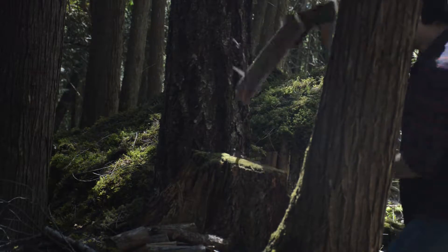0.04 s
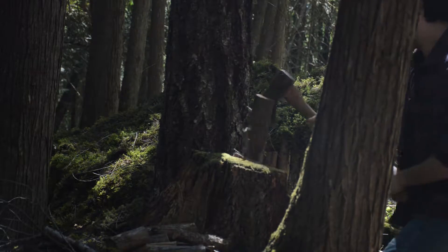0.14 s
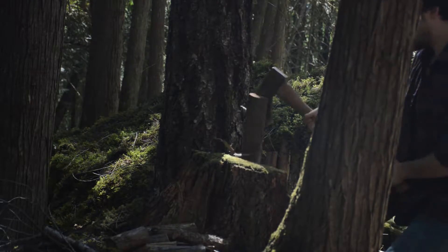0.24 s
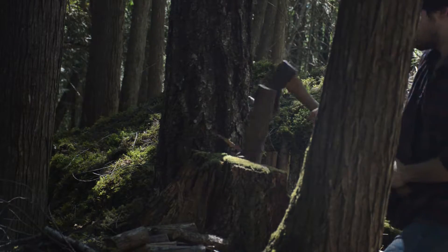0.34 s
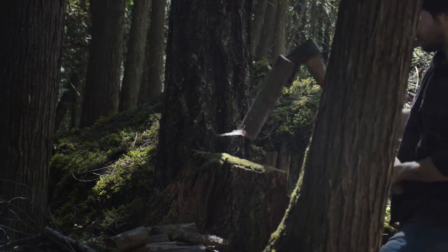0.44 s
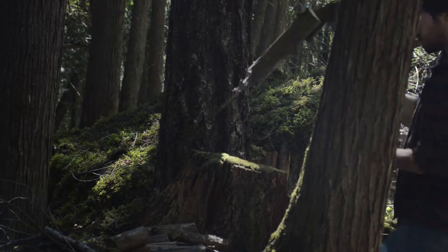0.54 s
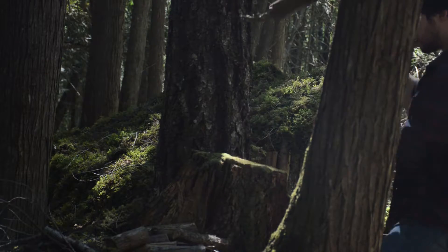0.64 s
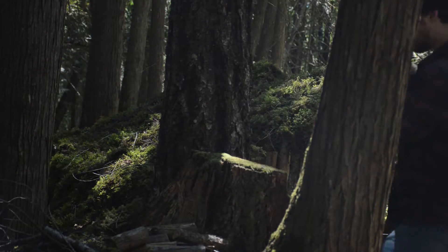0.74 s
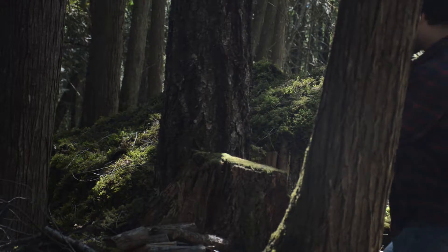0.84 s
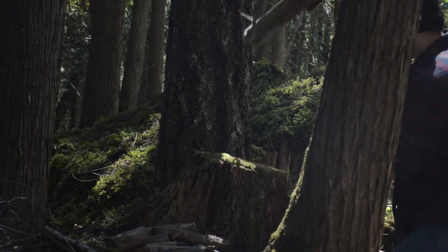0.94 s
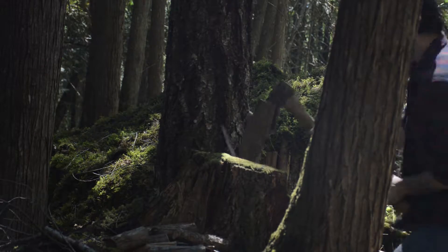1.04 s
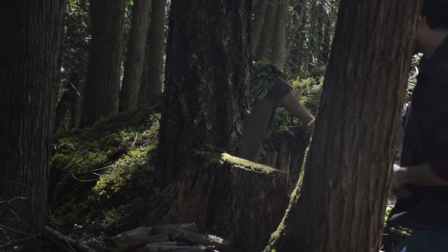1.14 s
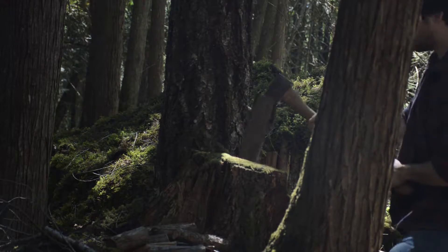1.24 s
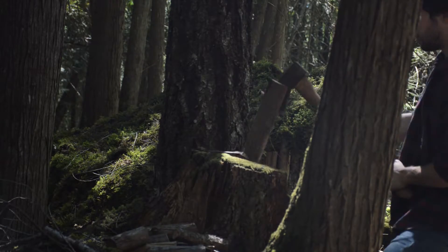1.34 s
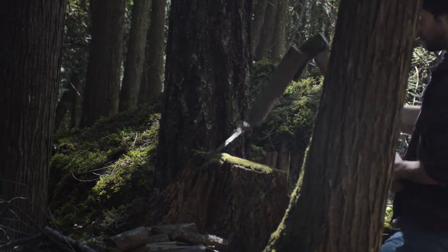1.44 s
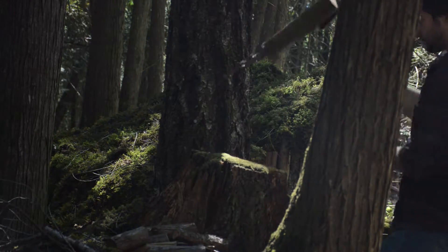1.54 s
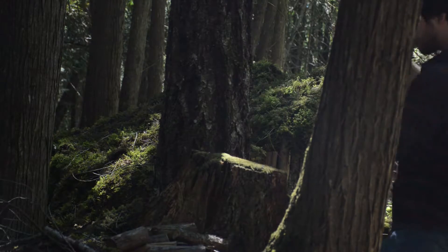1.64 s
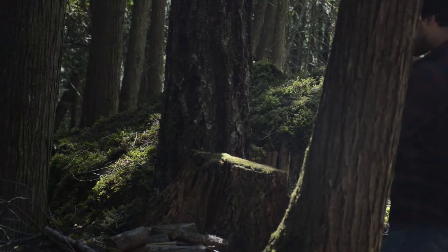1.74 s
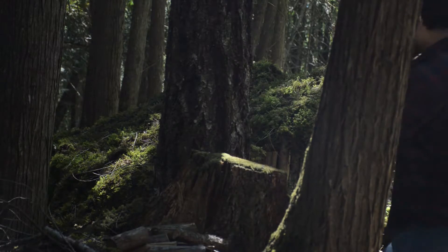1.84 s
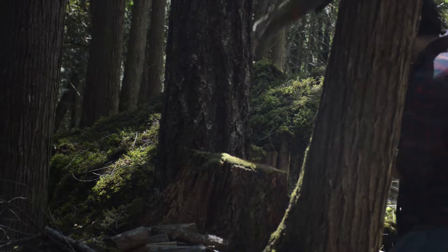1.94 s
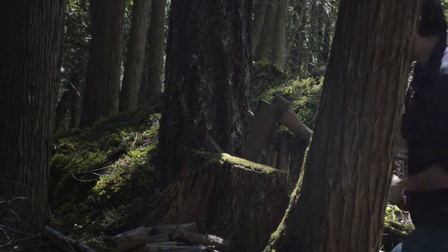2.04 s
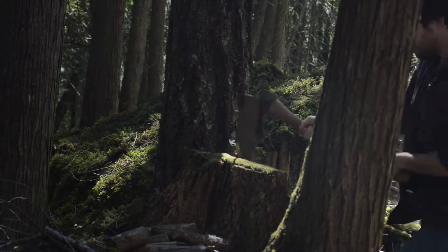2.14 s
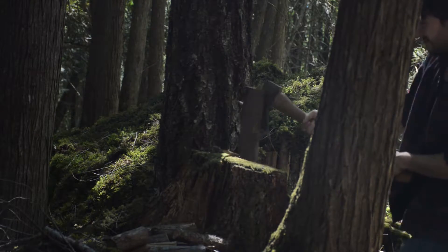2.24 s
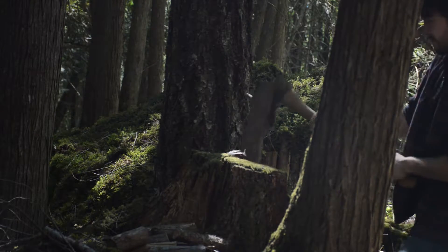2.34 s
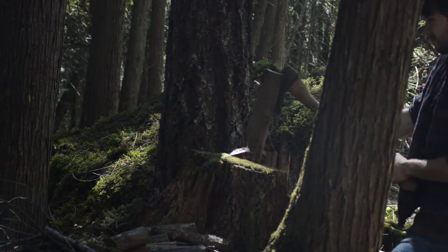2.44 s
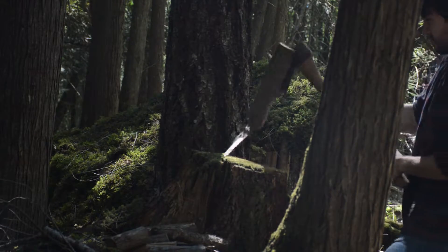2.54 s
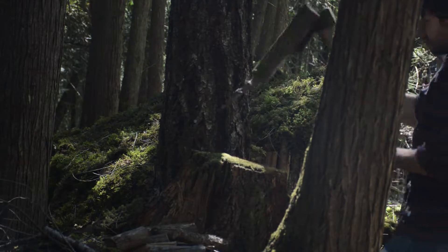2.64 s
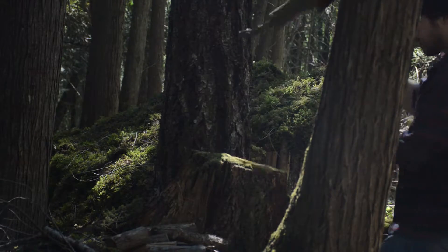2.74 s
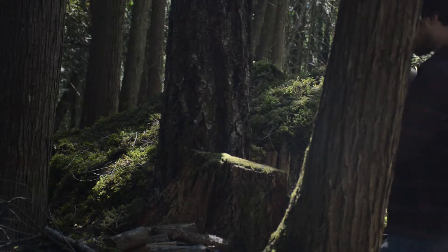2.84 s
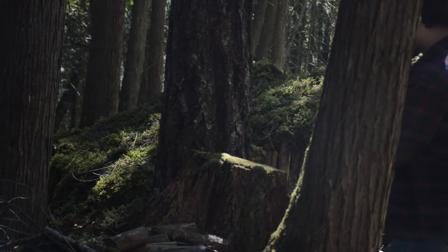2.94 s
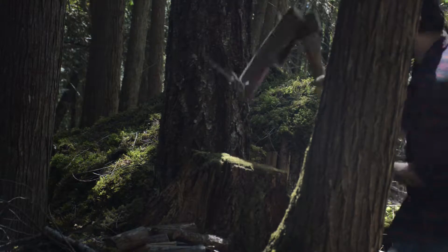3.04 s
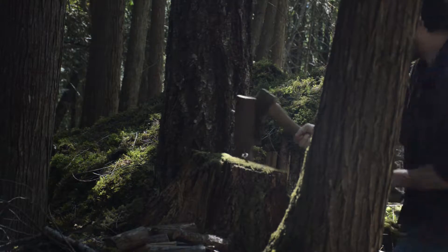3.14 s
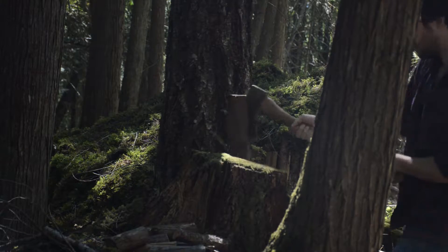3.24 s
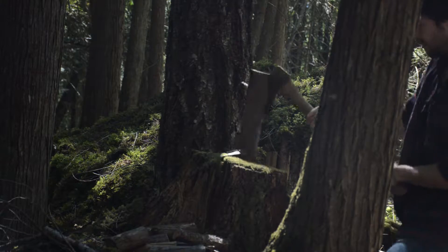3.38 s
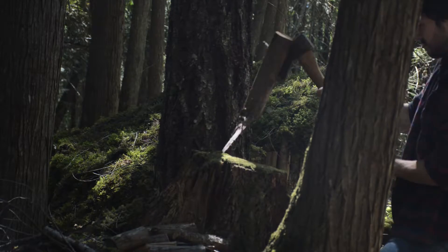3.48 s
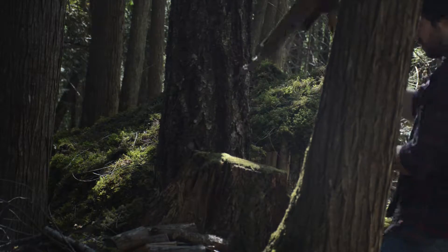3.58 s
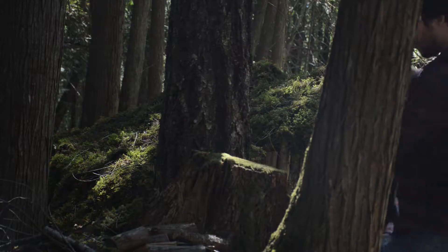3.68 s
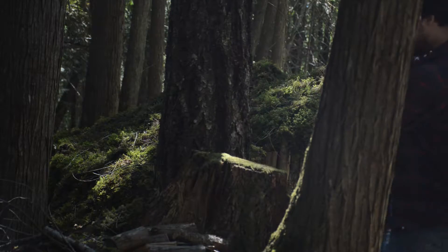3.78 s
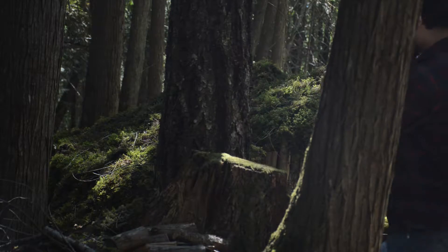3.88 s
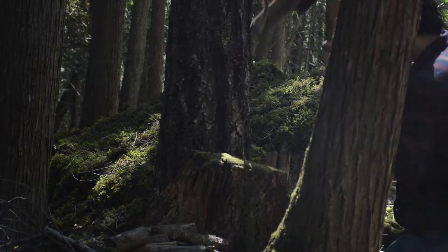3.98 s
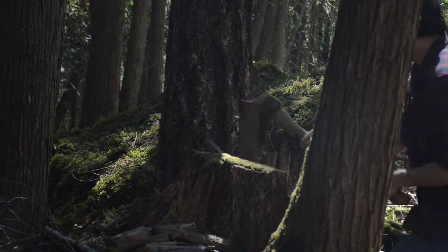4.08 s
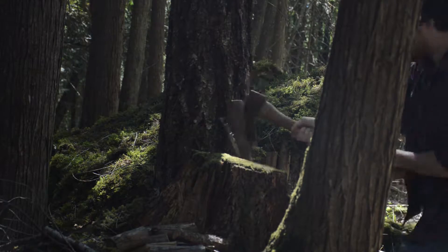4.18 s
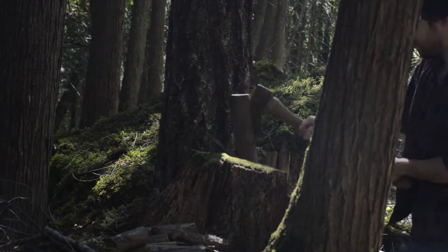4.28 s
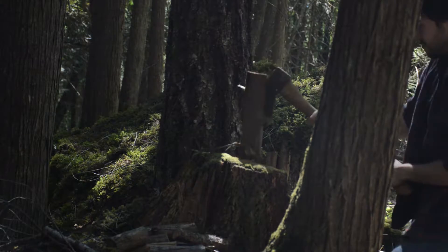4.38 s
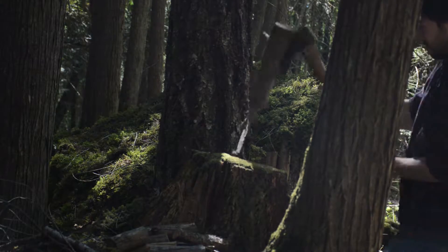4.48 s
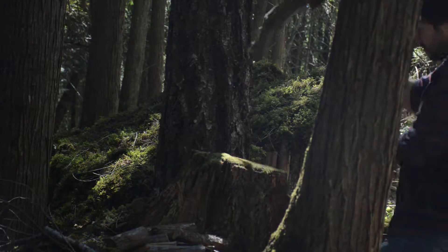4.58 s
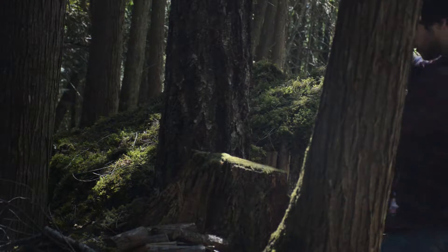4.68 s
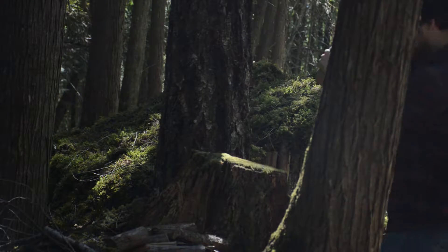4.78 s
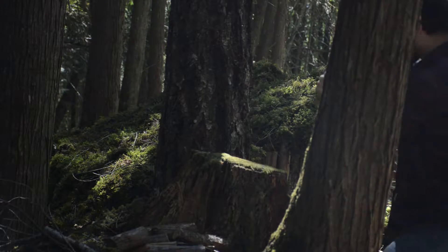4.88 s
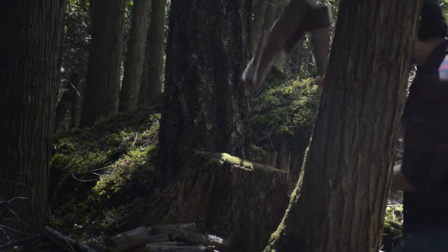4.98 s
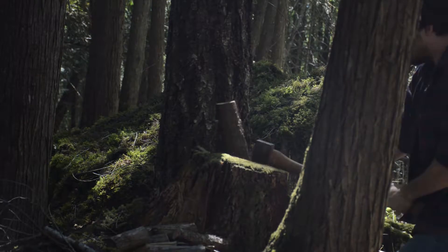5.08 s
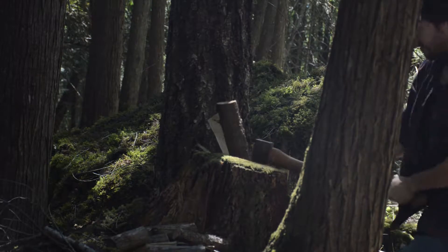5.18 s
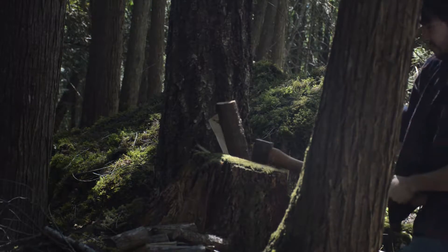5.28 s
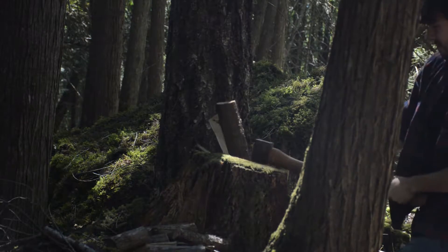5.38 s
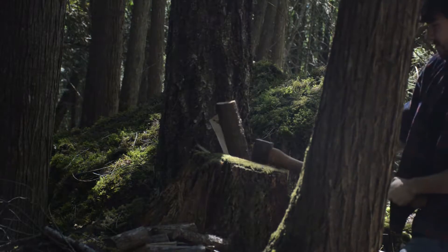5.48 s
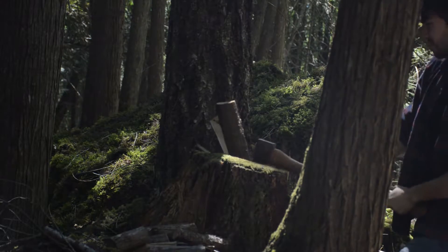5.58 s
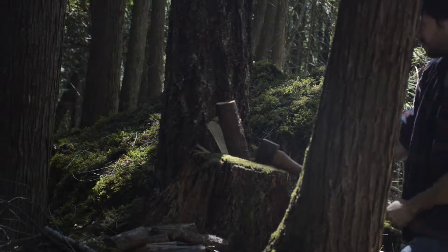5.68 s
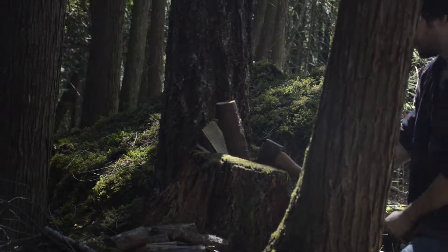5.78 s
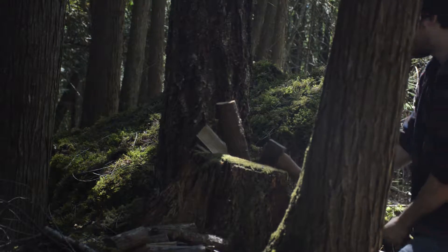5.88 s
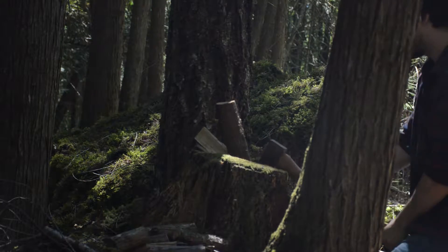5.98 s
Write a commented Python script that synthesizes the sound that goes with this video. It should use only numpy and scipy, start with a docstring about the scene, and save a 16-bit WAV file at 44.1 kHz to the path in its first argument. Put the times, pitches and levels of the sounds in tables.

```python
"""A small axe, wedged in a log, is swung down on a mossy stump six times in a conifer forest.
Each blow is a crunch of wood on wood, a crack as the blade drives deeper and a dull thud of the stump,
made of noise bursts and decaying resonances. Near trunks spray the sound back and the far forest adds a tail.
Air hisses softly, wood ticks, sleeves brush and a few birds whistle. The hardest cracks overload the microphone."""
import sys
import numpy as np
from scipy import signal
from scipy.fft import rfft, irfft, next_fast_len
from scipy.io import wavfile

SR = 44100
rng = np.random.default_rng(int(sys.argv[2]) if len(sys.argv) > 2 else 0)


def store_pcm(level_fs):
    """Save levels as 16-bit WAV."""
    pcm = np.round(np.clip(level_fs, -1, 1) * 32767).astype(np.int16)
    wavfile.write(sys.argv[1], SR, np.atleast_2d(pcm).T)


N = 265466
T = np.arange(N) / SR  # seconds
LEAD_S = 0.01  # silence ahead of each burst, room for its filters to spread


def from_db(db):
    """Turn decibels into an amplitude factor."""
    return 10 ** (np.asarray(db) / 20)


def rms_one(x):
    """Scale to an rms of 1."""
    return x / np.sqrt(np.mean(x ** 2) + 1e-20)


def at_hz(points, hz, axis=1):
    """Read one column of a table on a log-frequency axis."""
    points = np.array(points)
    log_hz = np.log(np.maximum(hz, 1))
    return np.interp(log_hz, np.log(points[:, 0]), points[:, axis])


def colour(x, spectrum, tilt_db=0):
    """Give a sound a spectrum, tilted per octave above 250 Hz; an even sound about keeps its energy."""
    padded = next_fast_len(len(x))
    hz = np.fft.rfftfreq(padded, 1 / SR)
    tilt = tilt_db * np.log2(np.maximum(hz, 250))
    gain = rms_one(from_db(at_hz(spectrum, hz) + tilt))
    return irfft(rfft(x, padded) * gain, padded)[:len(x)]


def noise(spectrum, size):
    """Steady noise of a given colour; rms 1."""
    return rms_one(colour(rng.standard_normal(size), spectrum))


def add(track, s, sound):
    """Mix a sound into a track from a given time on."""
    start = int(s * SR)
    track[start:start + len(sound)] += sound[:N - start]


def burst(t, length, rise, fall):
    """Fibres start to give, keep breaking for a while, then settle."""
    settling = np.exp(-np.maximum(t - length, 0) / fall)
    return (1 - np.exp(-t / rise)) * settling


def fracture(shape, count=2):
    """Force of countless breaking fibres: random under its envelope, and nearly even across frequency."""
    force = rng.standard_normal(len(shape)) * shape
    for _ in range(count):
        flattened = irfft(np.exp(1j * np.angle(rfft(force))), len(shape))
        force = flattened * np.sqrt(shape)
    return force * np.linalg.norm(shape) / np.linalg.norm(force)


def resonate(x, hz, width):
    """One damped two-pole resonance, with a gain of about 1 at its peak."""
    r = np.exp(-np.pi * width / SR)
    zeros = np.array([1, 0, -1]) * (1 - r * r) / 2
    poles = [1, -2 * r * np.cos(2 * np.pi * hz / SR), r * r]
    return signal.lfilter(zeros, poles, x)


def ringing(modes, shape):
    """Wood rings under a rough force; keeps the energy of the force's envelope."""
    force = fracture(shape)
    ring = 0
    for k, (hz, width, db) in enumerate(modes):
        ring = ring + (-1) ** k * from_db(db) * resonate(force, hz, width)
    return ring * np.linalg.norm(shape) / np.linalg.norm(ring)


# Spectrum of the forest air at the microphone. Each row: frequency in Hz, relative density in dB per Hz.
AIR_SPECTRUM = [(20, -8.5), (40, -3), (66, -4), (82, -6.5), (99, 3), (125, -8), (195, -9), (320, -13),
                (600, -8.5), (1600, -7.5), (3200, -11), (7000, -21), (9800, -24), (12500, -32.5),
                (16000, -35)]
AIR_DB = -44.5


def air():
    """The forest air is a steady, soft hiss of coloured noise."""
    return from_db(AIR_DB) * noise(AIR_SPECTRUM, N)


# The log shifts on the blade, chips drop. Each row: start in seconds, level in dB.
TICKS = [(0.15, -24.5), (0.2983, -41), (1.227, -39), (3.0356, -39), (3.2790, -40), (4.074, -21),
         (4.46, -41), (5.0223, -41.5)]
# Sleeves brush during the swing. Each row: middle in seconds, level in dB, half length in seconds.
BRUSHES = [(1.065, -40, 0.0045), (1.59, -53.5, .035), (2.037, -41, 0.0066), (4.42, -55, 0.022)]
# Spectrum shared by ticks and brushes. Each row: frequency in Hz, relative density in dB per Hz.
SMALL_WOOD = [(300, -47.5), (1500, -23), (2600, -8), (5000, -4.5), (7500, 1.5), (10500, 0), (13000, -16.5),
              (16000, -21)]
# a louder tick is a longer slip: its length at a reference level, and the dB that double it
TICK_S, TICK_DB, TICK_DB_PER_DOUBLING = 0.00092, -41, 16


def handling():
    """Dry ticks of wood and short brushes of cloth, both bright noise under brief envelopes."""
    out, t = np.zeros(N), T[:SR // 20]
    for s, db in TICKS:
        length = TICK_S * 2 ** ((db - TICK_DB) / TICK_DB_PER_DOUBLING)
        slip = burst(t, length, rise=0.00031, fall=0.00085)
        add(out, s, from_db(db) * noise(SMALL_WOOD, len(t)) * slip)
    strokes = sum(from_db(db) * np.exp(-((T - s) / half) ** 2 / 2) for s, db, half in BRUSHES)
    return out + strokes * noise(SMALL_WOOD, N)


def linger(power, onset, t60):
    """Sound energy builds up, then dies away; its total is kept."""
    rise = np.exp(-1 / (onset * SR))
    fall = from_db(-60 / (t60 * SR)) ** 2  # squared, as it acts on power
    return signal.lfilter([(1 - rise) * (1 - fall)], [1, -rise - fall, rise * fall], power)


# What the forest sends back to the microphone.
# Each row: frequency in Hz, near scatter in dB, far tail in dB, far t60 in seconds.
FOREST = [(60, -19, -12.5, 0.47), (159, -14, -25, 0.51), (405, -11.5, -14.5, 0.65), (974, -7.5, -12.5, 1),
          (2217, -7.5, -12, 1.0), (5180, -13.5, -18.5, 0.79), (9880, -16, -24, 0.45), (15200, -28, -28, .3)]
NEAR_T60_S, NEAR_ONSET_S, FAR_ONSET_S = 0.13, 0.00102, 0.011


def forest(x, lumpy_db):
    """Countless trunks and twigs smear each band into noise: a quick lumpy spray from near by, then a far tail."""
    edges = np.geomspace(640, 17000, 37) - 600  # 36 bands from 40 Hz to 16.4 kHz
    white = rng.standard_normal((2, N))  # neighbouring bands get unrelated noise
    # the near spray is lumpy: a new random level every few milliseconds
    knots = T[::SR // 400]
    lump_db = lumpy_db * np.interp(T, knots, rng.standard_normal(len(knots)))
    lumps = rms_one(from_db(lump_db))
    out = 0
    for k, (low, high) in enumerate(zip(edges, edges[1:])):
        band = signal.butter(2, [low, high], "band", fs=SR, output="sos")
        hz = np.sqrt(low * high)
        power = signal.sosfilt(band, x + 1e-9 * white[0]) ** 2
        near_gain, far_gain = from_db(at_hz(FOREST, hz, axis=1)), from_db(at_hz(FOREST, hz, axis=2))
        near = near_gain ** 2 * linger(power, NEAR_ONSET_S, NEAR_T60_S) * lumps ** 2
        far = far_gain ** 2 * linger(power, FAR_ONSET_S, at_hz(FOREST, hz, axis=3))
        carrier = rms_one(signal.sosfilt(band, white[k % 2]))
        out = out + np.sqrt(np.abs(near + far)) * carrier
    return out


# The log lands on the stump. Each row: start in seconds, crunch level in dB, length in seconds,
# brightness in dB per octave, knock pitch in Hz, knock level in dB.
LANDINGS = [(0.1645, -18.5, 0.0052, -0.9, 490, -19), (1.0981, -13.5, 0.0042, 0, 884, -21.5),
            (2.078, -14, 0.0051, -0.25, 1494, -20), (3.1622, -22, 0.0066, 1.2, 440, -25),
            (4.1179, -10, 0.0049, 1, 966, -14.5), (5.0953, -10, 0.0022, 1.8, 2140, -15.5)]
# Spectrum of crushed bark. Each row: frequency in Hz, relative density in dB per Hz.
CRUNCH = [(40, -9), (120, -0.5), (300, 2), (600, 1), (1100, -2.5), (1900, -4), (3000, -9.5), (4200, -8.5),
          (7000, -4.5), (10200, -7), (13000, -21.5), (16000, -28)]
# Lengthwise modes of the knocked log. Each row: multiple of the knock pitch, width in Hz, relative level in dB.
KNOCK = [(1, 111, 1), (2, 180, -5.5), (4, 204, -4)]
LANDING_SEND_DB = 1  # share of every landing that goes into the forest


def landings():
    """Bark is crushed for a few milliseconds over a hollow knock; gives the direct sound and the forest's share."""
    out, t = np.zeros(N), np.maximum(T[:SR // 10] - LEAD_S, 0)
    for s, db, length, tilt_db, knock_hz, knock_db in LANDINGS:
        shape = burst(t, length, rise=0.00063, fall=0.0043)
        crunch = from_db(db) * colour(fracture(shape), CRUNCH, tilt_db)
        modes = [(knock_hz * multiple, width, level) for multiple, width, level in KNOCK]
        knock = from_db(knock_db) * ringing(modes, shape)
        add(out, s - LEAD_S, crunch + knock)
    return np.array([out, out * from_db(LANDING_SEND_DB)])


# The stump takes the weight, and is bumped once more at the end. Each row: start in seconds,
# stump level in dB, pitch ratio, hardness in dB per octave, ground level in dB.
THUDS = [(0.1686, -6.5, 1.07, 2.5, -29), (1.1102, -13, 0.86, -7, -40), (2.1040, -14, 0.95, -3.5, -19),
         (3.176, -15.5, 0.9, -2, -12), (4.1301, -11, 0.983, -8, -15), (5.1044, -14.5, 0.93, 4.5, -13),
         (5.437, -38.5, 1.93, -4, -54.5)]
# Stump resonances at pitch ratio 1. Each row: frequency in Hz, relative level in dB, t60 in seconds.
STUMP = [(118, -5.5, 0.048), (164, 6.5, 0.037), (193.6, -12, 0.15), (260.3, -12, 0.073), (333, -12, 0.093),
         (496, -28.5, .16)]
GROUND_HZ, GROUND_T60_S = 84.2, 0.07
THUD_RISE_S = 0.0021


def thuds():
    """A soft push rocks the rotten stump and the ground under it for a few cycles."""
    out, t = np.zeros(N), T[:SR // 3]
    main_hz = STUMP[1][0]
    for s, db, pitch, hardness_db, ground_db in THUDS:
        modes = [(GROUND_HZ, ground_db, GROUND_T60_S)]
        for hz, level, t60 in STUMP:
            # a harder contact favours the modes above the stump's main one
            contact_db = hardness_db * np.log2(hz / main_hz)
            modes.append((hz * pitch, db + level + contact_db, t60))
        swing = sum(from_db(level - 60 * t / t60) * np.sin(2 * np.pi * hz * t) for hz, level, t60 in modes)
        soft_start = 1 - np.exp(-(t / THUD_RISE_S) ** 2)
        add(out, s, -swing * soft_start)
    return out


# The blade splits the grain. Each row: start in seconds, tearing level in dB, length in seconds,
# log ring level in dB, log pitch ratio.
SPLITS = [(0.1712, -10, 0.002, -19.5, 2.9), (1.109, -7, 0.00056, -19.5, 1.04),
          (2.0865, 0, 0.0037, -5, 0.97), (3.168, -9.5, 0.0025, -23.5, 1.04),
          (4.1234, -4.5, 0.00096, -24.5, 1.34), (5.096, 1, 0.0037, -12, 1.42)]
# Spectrum of tearing grain. Each row: frequency in Hz, relative density in dB per Hz.
TEARING = [(300, -22), (700, -16), (1500, -20.5), (3000, -21), (4800, -3), (7200, -0.5), (10200, 4.5),
           (12700, -11), (16000, -17)]
# Log resonances at pitch ratio 1. Each row: frequency in Hz, width in Hz, relative level in dB.
LOG = [(1010, 490, -5), (1475, 170, 2), (2110, 130, -0.5), (2920, 510, 1), (3740, 1900, -4.5),
       (5690, 540, -6.5)]
# a longer split opens more of the log and throws more sound into the forest
SPLIT_S, SPLIT_SEND_DB, SEND_DB_PER_DOUBLING = 0.0024, 2, 1.9


def splits():
    """The grain tears with a bright crack that sets the log ringing, higher for a thinner piece."""
    out, t = np.zeros((2, N)), np.maximum(T[:SR // 10] - LEAD_S, 0)
    for s, db, length, ring_db, pitch in SPLITS:
        tear_shape = burst(t, length, rise=0.00032, fall=0.5 * length)
        tear = from_db(db) * colour(fracture(tear_shape), TEARING)
        modes = [(hz * pitch, width, level) for hz, width, level in LOG]
        ring = from_db(ring_db) * ringing(modes, burst(t, length, rise=0.00023, fall=0.0028))
        crack = tear + ring
        send_db = SPLIT_SEND_DB + SEND_DB_PER_DOUBLING * np.log2(length / SPLIT_S)
        add(out[0], s - LEAD_S, crack)
        add(out[1], s - LEAD_S, crack * from_db(send_db))
    return out


# Bird notes among the trees, each one slur. Each row: start in seconds, length in seconds,
# start pitch in Hz, end pitch in Hz, level in dB.
NOTES = [(2.555, 0.077, 2650, 3023, -44.5), (2.749, 0.12, 3385, 2300, -42), (2.879, 0.078, 2970, 2595, -43),
         (2.919, .038, 4500, 6560, -40), (3.176, 0.027, 3120, 3310, -40), (3.25, 0.07, 2220, 3210, -43),
         (4.255, 0.045, 3700, 4720, -46), (4.363, 0.013, 6400, 4850, -39)]
WARBLE_DEPTH, WARBLE_HZ = 0.016, 75.5  # depth as a share of the pitch
# the trunks return low notes more strongly than high ones: echo level at a reference pitch, and its slope
BIRD_HZ, BIRD_ECHO_DB, ECHO_DB_PER_OCTAVE = 2800, 7, -8.5
BIRD_ECHO_T60_S = 1


def birds():
    """Slurred whistles with a slight warble; each comes back from many trunks, the low ones mostly as echo."""
    out, t = np.zeros(N), T[:SR]
    for s, length, start_hz, end_hz, db in NOTES:
        u = np.linspace(0, 1, int(length * SR))  # progress through the note
        warble = 1 + WARBLE_DEPTH * np.sin(2 * np.pi * (WARBLE_HZ * length * u + rng.random()))
        hz = (start_hz + (end_hz - start_hz) * u) * warble
        swell = np.sqrt(4 * u * (1 - u))
        note = from_db(db) * swell * np.sin(2 * np.pi * np.cumsum(hz) / SR)
        trunks = rng.standard_normal(len(t)) * from_db(-60 * t / BIRD_ECHO_T60_S)
        echo = signal.fftconvolve(note, trunks)
        echo *= np.linalg.norm(note) / np.linalg.norm(echo)
        echo_db = BIRD_ECHO_DB + ECHO_DB_PER_OCTAVE * np.log2(hz.mean() / BIRD_HZ)
        add(out, s, note)
        add(out, s, from_db(echo_db) * echo)
    return out


def scene():
    """Chopping and its echoes, birds, and the steady hiss of the forest air."""
    direct, sent = handling() + landings() + thuds() + splits()
    return (air() + direct + forest(sent, lumpy_db=2.0) + birds())[None]


LOW_CUT_HZ, CUTOFF_HZ = 63.4, 16100


def record(dry):
    """The deepest bass is rolled off and the loudest cracks are clipped flat; the sound ends at about 16 kHz."""
    low_cut = signal.butter(2, LOW_CUT_HZ, "high", fs=SR, output="sos")
    top_cut = signal.ellip(10, 0.1, 80, CUTOFF_HZ, fs=SR, output="sos")  # 0.1 dB ripple, 80 dB stop
    clipped = np.clip(signal.sosfilt(low_cut, dry), -1, 1)
    return signal.sosfilt(top_cut, clipped)


dry = scene()
out = record(dry)
store_pcm(out)
```